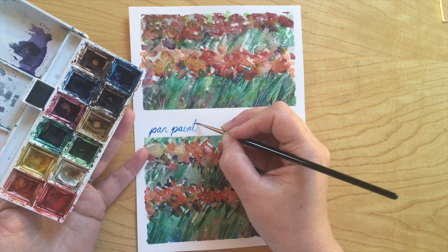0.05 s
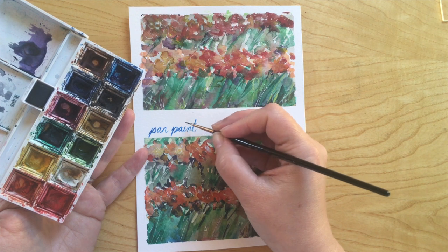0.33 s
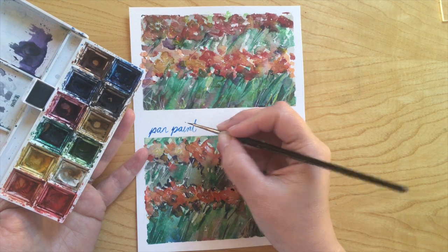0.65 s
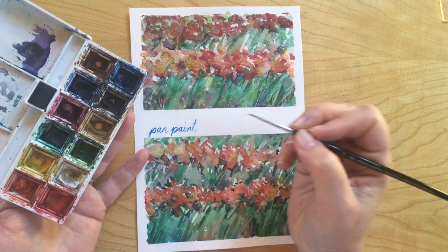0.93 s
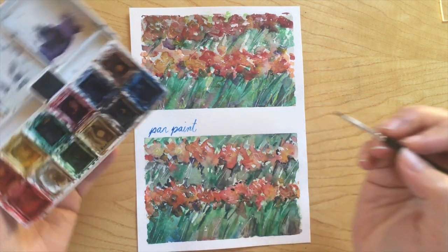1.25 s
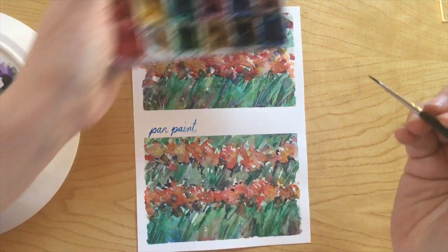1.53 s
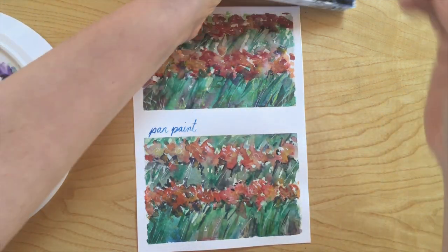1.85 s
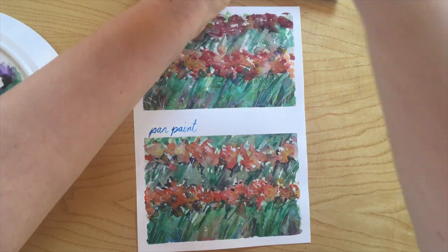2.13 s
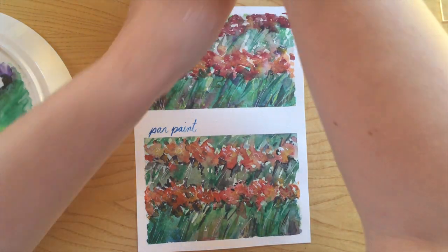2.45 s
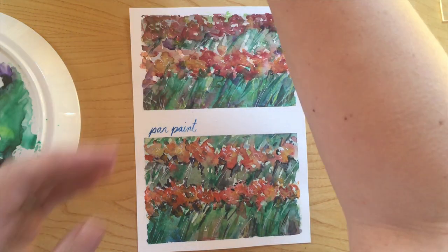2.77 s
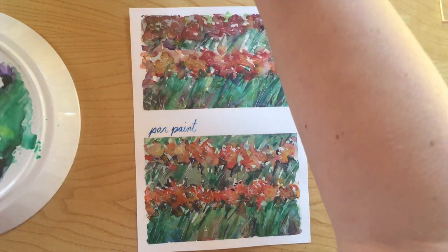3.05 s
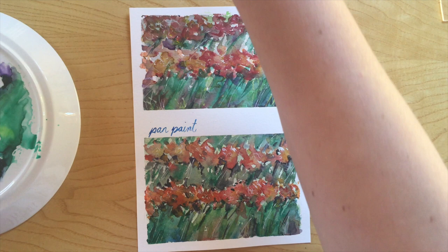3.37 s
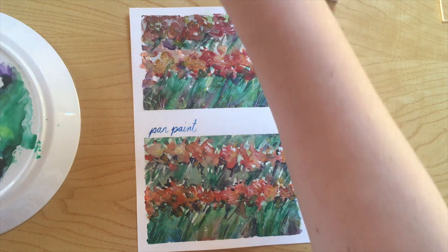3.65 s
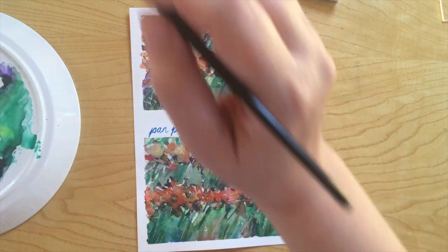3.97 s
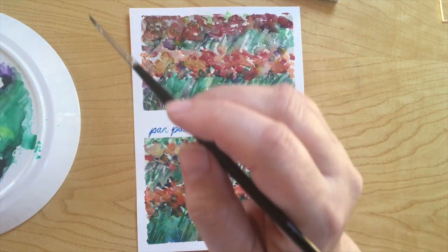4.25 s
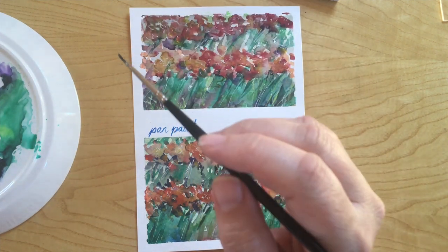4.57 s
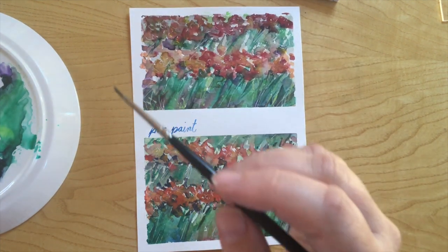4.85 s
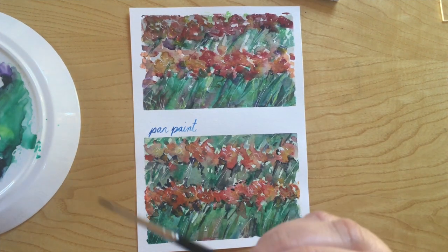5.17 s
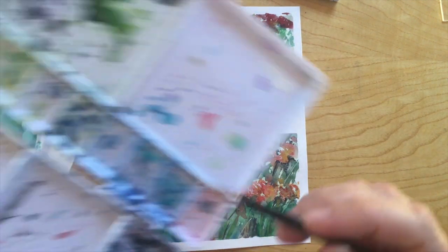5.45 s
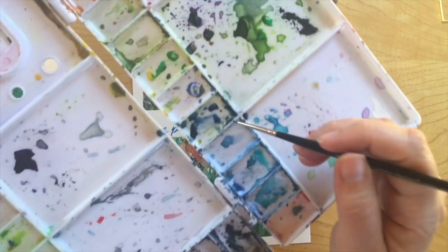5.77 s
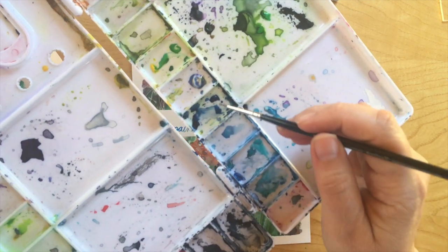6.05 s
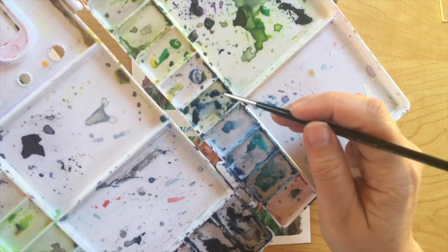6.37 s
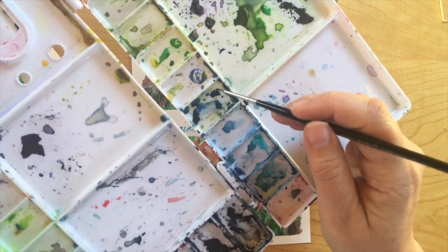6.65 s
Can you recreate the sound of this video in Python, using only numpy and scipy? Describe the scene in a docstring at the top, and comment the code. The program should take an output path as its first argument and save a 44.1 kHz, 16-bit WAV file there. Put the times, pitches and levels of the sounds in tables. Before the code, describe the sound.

Faint low rumble and hiss run throughout, in a small, dry room heard close up. A hand bumps a wooden table softly at about 0.5 seconds. From 1 second a box of watercolour pans slides faintly, with a thin scrape near 1.7. It lands at 1.8 in a loud, short clatter, its pans rattling until 2 seconds. At about 2.4 the lid snaps shut with a loud, sharp click and a knock in the wood. Soft hand bumps follow at 2.6, then a few faint fingertip ticks. Around 4.2 a brush handle knocks lightly, with a dull bump. Between 4.5 and 4.8 a plastic palette clicks about four times and thumps gently on the tabletop, quieter than the box. Faint taps and brushing skin continue until about 5.3, and one very soft bump comes near 5.9. Only the room's background remains until about 7 seconds.

```python
"""Low rumble and faint microphone hiss fill a small, dry room, and a hand bumps softly on a wooden table.
A box of watercolour pans is lifted, scrapes and lands in a short clatter, then its lid snaps shut.
Hands fetch a brush and pick up a plastic palette, which clicks and bumps the tabletop.
Box, lid and palette hits are noise bursts in the object's colour, layered with its ringing modes
and the wood below; slides and swishes are filtered noise that swells with each stroke."""
import sys
import numpy as np
from scipy import signal
from scipy.fft import rfft, irfft, next_fast_len
from scipy.io import wavfile
from scipy.ndimage import map_coordinates

SR = 44100
rng = np.random.default_rng(int(sys.argv[2]) if len(sys.argv) > 2 else 0)


def master_out(mix):
    """Clip the mix to full scale and print it as 16-bit PCM to the path in sys.argv[1]."""
    frames = np.transpose(np.atleast_2d(mix))
    ceiling = np.clip(frames, -1, 1)
    pcm = np.round(ceiling * 32767).astype(np.int16)
    wavfile.write(sys.argv[1], SR, pcm)


N = 300321
T = np.arange(3 * SR // 4) / SR  # seconds after a contact

# colours of the room tone and the rubbing layers: freq_hz, gain_db
RUMBLE_EQ = [(12, -34.5), (20, -6), (80, -4.5), (134, -7), (168, -10), (210, -10), (300, -18.5),
             (455, -24.5), (505, -28.5), (700, -28.5), (910, -53), (1540, -120)]
HISS_EQ = [(200, -10), (500, 3), (1000, 5.5), (2200, 1), (3500, -2), (4900, -7), (6300, -2), (7800, -7.5),
           (9500, -1.5), (10400, -7.5), (11500, -0.5), (12600, 0), (14000, -1.5), (16000, -4)]
SLIDE_EQ = [(200, -16), (750, -7.5), (1000, 5), (1150, -6.5), (1300, -1), (1500, -4), (1850, -1.5),
            (2100, -9), (2500, -5), (3000, -7), (3400, -12.5), (4500, -18), (12000, -29.5)]
SWISH_EQ = [(1000, -17), (3500, 2.5), (5000, -3), (6500, 1), (8500, -4), (13000, 0.5), (16000, -4)]
# colours of the hits (each body's damped vibration, wood knock, bright crack): freq_hz, gain_db
BOX_EQ = [(200, -30.5), (780, -17.5), (1080, -1), (1700, -0.5), (2150, -6), (2800, 4), (3500, -7),
          (6200, -11), (8000, -25.5), (16000, -31.5)]
LID_EQ = [(200, -17.5), (550, -7.5), (1150, -0.5), (2000, -3), (2900, 1), (4200, -8.5), (5400, -10),
          (6500, -11.5), (8200, -19), (9900, -18), (10700, -26), (12200, -21.5), (16000, -28.5)]
PALETTE_EQ = [(150, -11), (450, -11), (900, -7.5), (1600, -2.5), (2050, -2.5), (2500, 3.5), (3100, -6),
              (4200, -5.5), (5000, -10.5), (6500, -5), (8500, -18), (15000, -14)]
KNOCK_EQ = [(40, -22.5), (100, -12), (160, 1.5), (400, -4.5), (650, -1.5), (1200, -20), (4000, -52)]
CRACK_EQ = [(2000, -32), (5500, -4), (7000, 2.5), (8000, -4), (9800, 0), (10700, -7.5), (12000, 0.5),
            (16000, -10)]
# the room's short tail: freq_hz, t60_s
ROOM_DECAY = [(100, 0.4), (400, 0.28), (1500, 0.19), (5000, .18), (10000, 0.19), (16000, .13)]
# ringing modes of each object, and the faint tail of the snap: pitch_hz, level_db, t60_s
BOX_MODES = [(1030, -2, 0.1), (1300.6, -5.5, 0.11), (1510, -8, .08), (1595, -4.5, .08), (1865, -0.5, .1),
             (2000, -6, 0.12), (2410, 1, .07), (2550, -2.5, 0.15), (2844, 2, 0.073), (3870, 1, 0.029),
             (4280, -9.5, 0.09), (5560, -13, .07), (6070, -7.5, 0.064), (6900, -11, 0.063)]
LID_MODES = [(1068, -1, 0.12), (1276, 1.5, 0.088), (1561, -3, 0.1), (1950, -11, 0.122), (2179, -10, 0.13),
             (2484, -4, 0.1), (2708, -3.5, .14), (2990, -6.5, .1), (3230, -5, 0.091), (3718, -9.5, 0.12),
             (3761, -11, 0.09), (4450, -9, 0.15), (6260, -12, .12)]
PALETTE_MODES = [(964, -3, 0.14), (1123, -10, 0.14), (1544, 7, 0.065), (2310, 5.5, 0.082),
                 (2550, -12.5, 0.41), (3180, -26, .14)]
WOOD_UNDER_PALETTE = [(145, -2.5, 0.27), (198.8, 0.5, 0.21), (225, -4, 0.16), (818, -17, 0.1),
                      (1000, -11, 0.14)]
WOOD_UNDER_BOX = [(125, -8.5, 0.048), (157.2, -1, .13), (200, -4.5, 0.054), (275, -4, .08), (338, 6, 0.078),
                  (469, 1.5, 0.12), (590, 1, 0.085)]
SNAP_TAIL = [(440, -62.5, 1.5), (484.2, -63, 1.5), (700, -66, 1.1), (680, -66.5, 1.6), (3260, -65, .7),
             (3530, -63, 0.57)]
# things slide in the hand or on wood; skin brushes paper and table: start_s, length_s, level_db
OBJECT_SLIDES = [(1.05, 0.75, -71), (1.7, 0.18, -60.5), (1.78, 0.31, -52.5), (2.0, 1, -72),
                 (4.14, 0.26, -65)]
SKIN_SWISHES = [(.69, 0.13, -68.5), (1.27, .53, -70), (1.71, .3, -59.5), (1.95, 0.56, -74),
                (4.3, 0.96, -73), (5.15, .7, -80.5)]
# the box's edge catches, first low, then in a thin squeak: start_s, length_s, level_db, pitch_hz
EDGE_SCRAPES = [(1.637, 0.19, -62.5, 1334), (1.722, .11, -61.5, 3850)]
# resonances of that scrape: pitch_ratio, level_db
EDGE_PARTIALS = [(1, 0), (1.39, -0.5), (1.76, -3.5)]
# light touches of hands, wooden brush handle and fingertips: start_s, level_db, centre_hz, t60_s
HAND_BUMPS = [(.546, -50, 315, .12), (2.605, -43.5, 190, .16), (2.645, -43.5, 190, .12),
              (4.16, -44.5, 229.9, .22), (4.195, -40, 220, 0.33), (5.86, -49, 148, .08)]
HANDLE_KNOCKS = [(3.842, -52, 2260, .055), (4.16, -40, 2400, .11), (4.19, -38.5, 1090, .05),
                 (4.207, -40.5, 744, 0.057), (4.27, -50.5, 1900, .14), (4.42, -56, 1300, .1),
                 (4.935, -55, 750, 0.038), (5.19, -55, 780, 0.12)]
FINGER_TICKS = [(1.1, -61.5, 5900, .06), (2.942, -56, 7350, .13), (3.081, -57, 4100, .03),
                (3.134, -59, 11000, .17), (3.639, -63, 2615, .07), (5.011, -55.5, 11100, .1),
                (5.181, -53.5, 6820, .11)]
# the palette clicks and taps: start_s, click_db, thump_db, brightness_hz, relative_ring_db
PALETTE_TAPS = [(4.49, -22.5, -44, 10000, 0.5), (4.6622, -29.5, -32.5, 2260, -2),
                (4.677, -54, -46, 4500, 5), (4.7428, -30.5, -46.5, 6000, 0),
                (4.7954, -31, -43.5, 3140, -11)]
# the lid is nudged, shuts and settles: start_s, level_db, relative_knock_db, brightness_hz
LID_HITS = [(2.267, -33.5, -22.5, 3230), (2.2794, -40.5, -21.5, 4600), (2.3534, -6, -19.5, 14000),
            (2.3742, -21.5, -17, 16000)]
# the box lands and its pans rattle: start_s, level_db, relative_knock_db, relative_crack_db
BOX_HITS = [(1.7339, -44.5, -20, -6), (1.826, -14.5, -23, -23), (1.8465, -11, -27, -22.5),
            (1.8724, -22.5, -29.5, -21.5), (1.8992, -23, -37, -15.5), (1.914, -7, -42, -12.5),
            (1.922, -16.5, -38.5, -26.5), (1.9747, -12.5, -47.5, -16.5), (1.9874, -28, -24, -20),
            (2.169, -50, -14.5, -33.5)]


def amp(db):
    """Decibels to gain."""
    return 10 ** (np.asarray(db) / 20)


def unit(x):
    """Scale to rms 1."""
    return x / np.sqrt(np.mean(x ** 2) + 1e-20)


def unit_hit(x):
    """Scale a transient to the energy of 10 ms at rms 1."""
    return x / np.sqrt(np.sum(x ** 2) / (SR / 100) + 1e-20)


def along(points, hz):
    """Read a curve of (freq_hz, value) points on a log frequency axis."""
    freqs, values = np.transpose(points)
    return np.interp(np.log(hz + 1), np.log(freqs), values)


def bell(hz, centre_hz, octaves):
    """Gain in dB of one resonance, 6 dB down at `octaves` either side."""
    return -20 * np.log10(1 + (np.log2((hz + 1) / centre_hz) / octaves) ** 2)


def shaped(x, gain_db):
    """Minimum-phase EQ from a gain function of frequency: nothing rings ahead of an attack."""
    size = 2 * next_fast_len(len(x) // 2 + 4096)
    gain = amp(gain_db(np.fft.rfftfreq(size, 1 / SR)))
    cepstrum = irfft(np.log(np.maximum(gain, 1e-6)), size)
    cepstrum[1:size // 2] *= 2
    cepstrum[size // 2 + 1:] = 0
    return irfft(rfft(x, size) * np.exp(rfft(cepstrum)), size)[:len(x)]


def coloured(x, eq):
    """Run x through an EQ table."""
    return shaped(x, lambda hz: along(eq, hz))


def softened(x, brightness_hz):
    """Low-pass: a softer contact loses its treble."""
    return shaped(x, lambda hz: -10 * np.log10(1 + (hz / brightness_hz) ** 6))


def fade(t60_s):
    """Exponential decay of 60 dB in t60_s."""
    return np.exp(-np.log(1000) * T / t60_s)


def burst(t60_s):
    """Dying noise: many overlapping modes."""
    return rng.standard_normal(len(T)) * fade(t60_s)


def mode(hz, db, t60_s):
    """One dying sine."""
    return amp(db) * np.sin(2 * np.pi * hz * T) * fade(t60_s)


def ring(modes):
    """Damped modes, struck at slightly new strengths and random signs each time."""
    strengths = rng.choice([-1, 1], len(modes)) * amp(rng.standard_normal(len(modes)))
    return unit_hit(sum(strength * mode(*row) for strength, row in zip(strengths, modes)))


def contact(eq, t60_s, wet_db):
    """A quickly damped vibration and the diffuse answer of the walls, both in the body's colour."""
    hz, t, bands = signal.stft(rng.standard_normal(len(T)), SR, nperseg=256)
    decay = np.exp(-np.log(1000) * t / along(ROOM_DECAY, hz)[:, None])
    walls = signal.istft(bands * decay, SR, nperseg=256)[1][:len(T)]
    walls *= 1 - np.exp(-(T / 0.0038) ** 2)  # reflections take a moment to build
    return unit_hit(coloured(unit_hit(burst(t60_s)) + amp(wet_db) * unit_hit(walls), eq))


def friction(grain_db, rate_hz):
    """Grainy rubbing noise: its level flutters along a smooth random curve."""
    noise = rng.standard_normal(N)
    knots = rng.standard_normal(int(N * rate_hz / SR) + 4)
    flutter = map_coordinates(knots, [np.arange(N) * rate_hz / SR])
    return noise * amp(grain_db * flutter)


def strokes(rows, skew=0.73, sharpness=1.2):
    """Rubbing envelope: each stroke speeds up and slows down, peaking early for a skew under 1."""
    t = np.arange(N) / SR
    power = np.zeros(N)
    for start_s, length_s, db in rows:
        progress = np.clip((t - start_s) / length_s, 0, 1) ** skew
        arch = np.abs(np.sin(np.pi * progress)) ** sharpness
        power += (amp(db) * arch) ** 2
    return np.sqrt(power)


def reach(start_s=0.89, end_s=6.55, rise_s=0.7, fall_s=1.55):
    """Arm movement across the table and back, 0 to 1: rise, hold, fall."""
    t = np.arange(N) / SR
    return np.clip(np.minimum((t - start_s) / rise_s, (end_s - t) / fall_s), 0, 1)


def add(track, start_s, sound):
    """Mix a sound into the track at start_s."""
    part = track[max(round(start_s * SR), 0):][:len(sound)]
    part += sound[:len(part)]


def room_tone():
    """The bed: low rumble, stronger while the arms move, and even microphone hiss."""
    rumble = amp(-68 + 4 * reach()) * unit(coloured(rng.standard_normal(N), RUMBLE_EQ))
    hiss = amp(-74.5) * unit(coloured(rng.standard_normal(N), HISS_EQ))
    return rumble + hiss


def skin_swishes():
    """Skin brushes paper and table in airy strokes, over a faint swish that follows the arms."""
    swish = unit(coloured(friction(grain_db=1.1, rate_hz=71), SWISH_EQ))
    return np.hypot(strokes(SKIN_SWISHES), amp(-79.5) * reach()) * swish


def slides():
    """Friction against hands and table sets the box's modes singing faintly."""
    rub = friction(grain_db=1.7, rate_hz=370)
    gripped_ring = ring(BOX_MODES) * fade(t60_s=0.064)
    hollow = unit(signal.fftconvolve(rub, gripped_ring)[:N])
    surface = unit(coloured(rub, SLIDE_EQ))
    return strokes(OBJECT_SLIDES) * unit(surface + amp(-5) * hollow)


def edge_scrapes():
    """The box's dragged edge sticks and slips, exciting three narrow resonances."""
    out = np.zeros(N)
    for start_s, length_s, db, pitch_hz in EDGE_SCRAPES:
        def resonances(hz):
            return np.max([level_db + bell(hz, ratio * pitch_hz, octaves=0.066)
                           for ratio, level_db in EDGE_PARTIALS], axis=0)
        slips = friction(grain_db=3, rate_hz=250)
        out += strokes([(start_s, length_s, db)]) * unit(shaped(slips, resonances))
    return out


def touches(rows, octaves):
    """Light, damped bumps, knocks or ticks, each with one broad resonance."""
    out = np.zeros(N)
    for start_s, db, centre_hz, t60_s in rows:
        scuff = contact([(20, 0), (20000, 0)], t60_s, wet_db=-7)  # flat EQ
        touch = shaped(scuff, lambda hz: bell(hz, centre_hz, octaves))
        add(out, start_s, amp(db - 10) * unit_hit(touch))
    return out


def palette():
    """Plastic clicks, duller for softer contacts; the heavy tabletop swells in behind them."""
    out = np.zeros(N)
    swell = 1 - np.exp(-(T / 0.0077) ** 2)
    for start_s, click_db, thump_db, brightness_hz, ring_db in PALETTE_TAPS:
        t60_s = 0.011 * amp(ring_db / 2)  # a firm grip damps the click along with its ring
        body = amp(-10) * contact(PALETTE_EQ, t60_s, wet_db=ring_db - 3)
        click = softened(body + amp(ring_db - 17) * ring(PALETTE_MODES), brightness_hz)
        wood = ring(WOOD_UNDER_PALETTE)
        low_end = shaped(burst(t60_s=0.16), lambda hz: bell(hz, centre_hz=72, octaves=0.91))
        thump = unit_hit((wood + amp(-9) * unit_hit(low_end)) * swell)
        add(out, start_s, amp(click_db) * click + amp(thump_db) * thump)
    return out


def table_knock():
    """A hard blow wakes the tabletop's upper modes, which peak just after the contact."""
    wood = ring(WOOD_UNDER_BOX) * (1 - np.exp(-T / 0.0033))
    thud = unit_hit(coloured(burst(t60_s=0.19), KNOCK_EQ))
    return unit_hit(wood + amp(-4) * thud)


def lid_snap():
    """The lid is nudged, then shuts in one heavy blow that drives the table and leaves a faint ring."""
    out = np.zeros(N)
    for start_s, db, knock_db, brightness_hz in LID_HITS:
        body = amp(-12.5) * contact(LID_EQ, t60_s=0.04, wet_db=-5)
        crack = amp(-26.5) * unit_hit(coloured(burst(t60_s=0.013), CRACK_EQ))
        hit = body + crack + amp(-15) * ring(LID_MODES) + amp(knock_db) * table_knock()
        add(out, start_s, amp(db) * softened(hit, brightness_hz))
    # close pairs of lightly damped modes beat on after the hardest blow
    hardest_s = max(LID_HITS, key=lambda row: row[1])[0]
    add(out, hardest_s, sum(mode(*row) for row in SNAP_TAIL))
    return out


def box_clatter():
    """Each hard contact shakes the box and its loose pans, cracks brightly and knocks the wood below."""
    out = np.zeros(N)
    for start_s, db, knock_db, crack_db in BOX_HITS:
        body = amp(-15.5) * contact(BOX_EQ, t60_s=0.028, wet_db=-7)
        crack = amp(crack_db - 4.5) * contact(CRACK_EQ, t60_s=0.018, wet_db=-11)
        hit = body + crack + amp(-17.5) * ring(BOX_MODES) + amp(knock_db - 0.5) * table_knock()
        add(out, start_s, amp(db) * hit)
    return out


def scene():
    """Everything on and around the table, in close-up mono."""
    hits = box_clatter() + lid_snap() + palette()
    hands = touches(HAND_BUMPS, octaves=0.54)
    brush = touches(HANDLE_KNOCKS, octaves=0.74)
    fingers = touches(FINGER_TICKS, octaves=0.37)
    rubbing = slides() + skin_swishes() + edge_scrapes()
    return (hits + hands + brush + fingers + rubbing + room_tone())[None]


def record(dry, cutoff_hz=15900):
    """A brick-wall low-pass takes the very top off the mix."""
    size = next_fast_len(N + SR // 2)
    hz = np.fft.rfftfreq(size, 1 / SR)
    return irfft(rfft(dry, size) / np.sqrt(1 + (hz / cutoff_hz) ** 200), size)[..., :N]


dry = scene()
out = record(dry)
master_out(out)
```